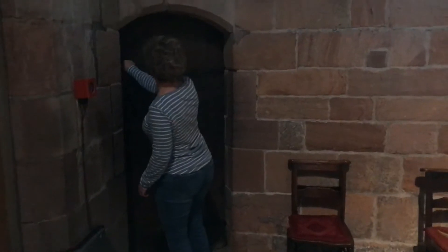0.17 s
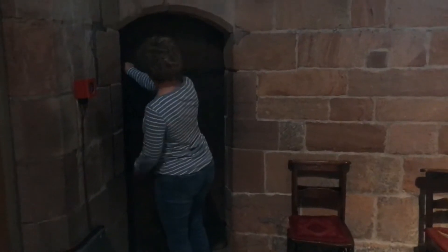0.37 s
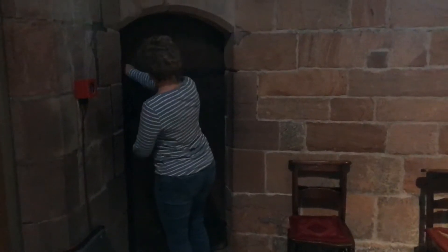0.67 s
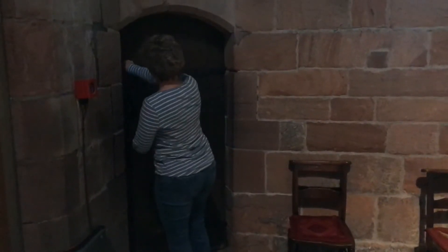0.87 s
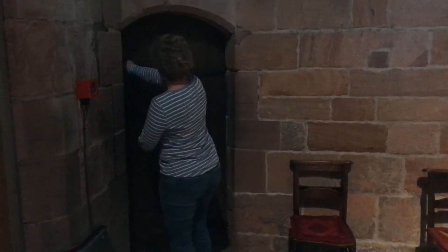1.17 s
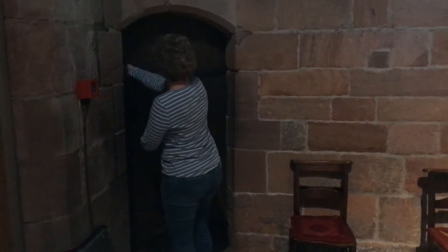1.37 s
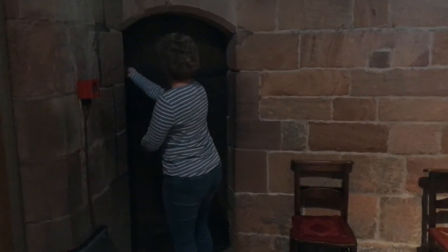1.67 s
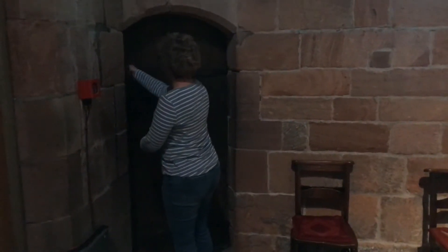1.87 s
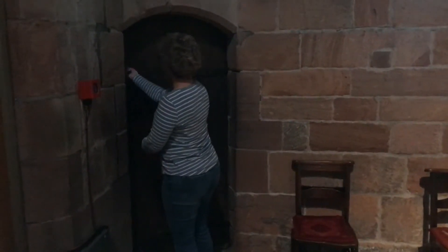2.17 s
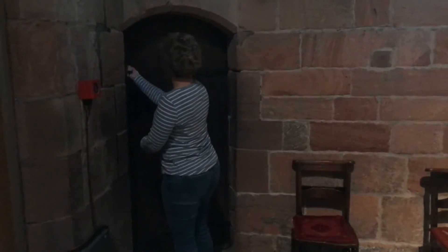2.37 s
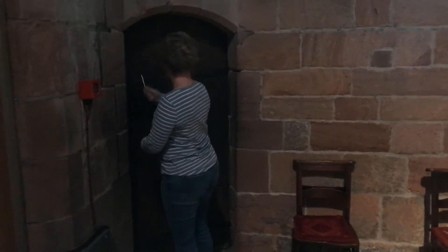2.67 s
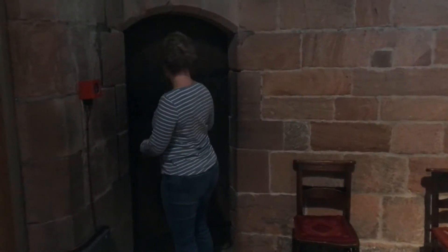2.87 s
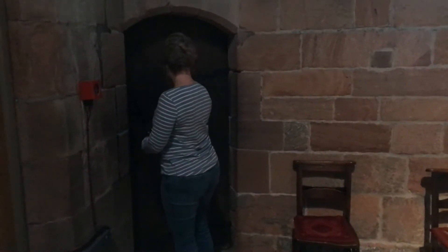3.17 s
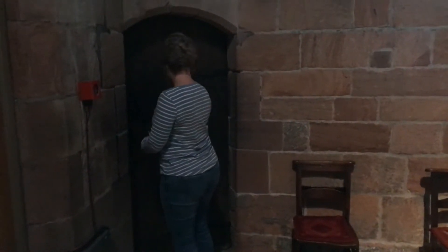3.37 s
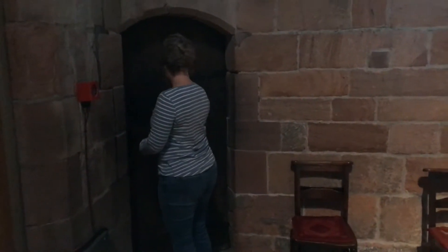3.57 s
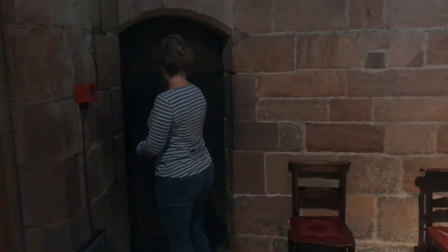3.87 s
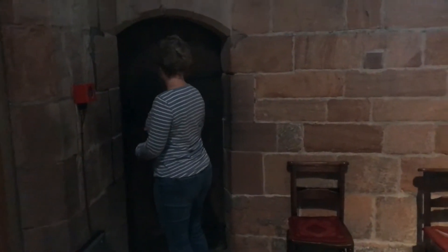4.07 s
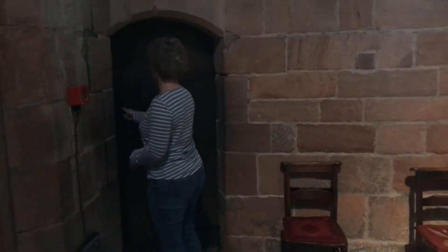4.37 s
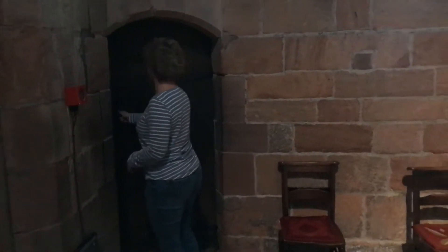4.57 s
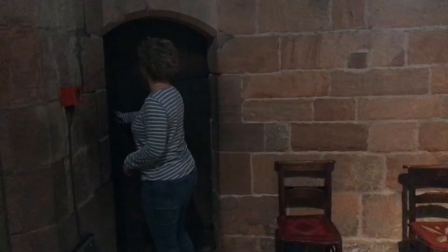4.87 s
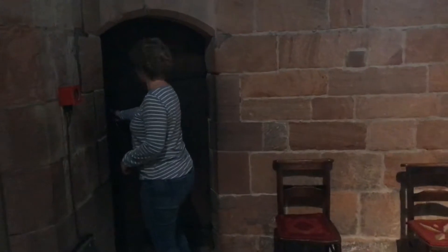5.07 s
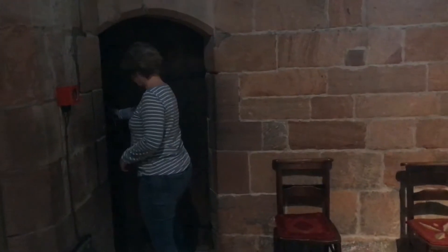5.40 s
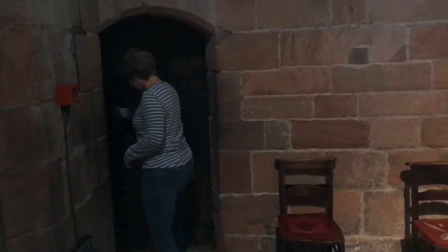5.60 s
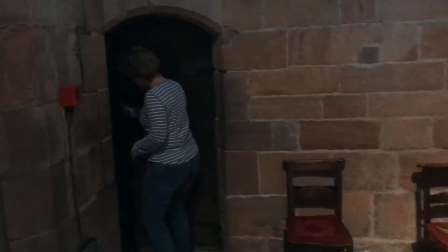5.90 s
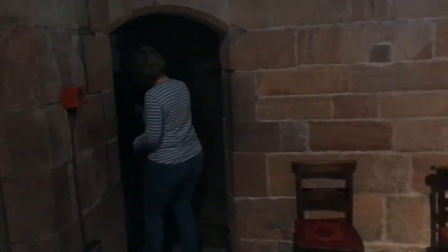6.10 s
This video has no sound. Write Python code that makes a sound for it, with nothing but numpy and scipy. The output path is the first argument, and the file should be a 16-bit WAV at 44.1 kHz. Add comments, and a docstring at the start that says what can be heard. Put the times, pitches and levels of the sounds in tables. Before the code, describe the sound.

Close to an old wooden door in a quiet stone room, iron slides and rattles in small uneven clicks, then a bolt shoots back with a loud ringing clank. Looser clinks, tiny bright metal ticks and thin squeaks follow. A lower latch clacks with a dull thud. After a pause the door is tugged free with a boom, rapid wooden shudder and gritty scrape, and the hinge briefly creaks.

```python
"""An old heavy wooden door in a stone room with a low, faint murmur. Iron slides and a sleeve brushes, then the upper
iron fastening is jiggled and shoots back with a clank; small metal ticks and thin squeaks follow, and the lower latch
clacks. The door is tugged free of its frame with a boom, a shudder and a scrape, and the hinge creaks. Blows are noise
bursts with dying sines, rubbing is many tiny slips, squeaks and creaks are repeating waves, and the stone walls ring."""
import sys
import numpy as np
from scipy import signal
from scipy.io import wavfile
from scipy.ndimage import uniform_filter1d

SR = 44100
rng = np.random.default_rng(int(sys.argv[2]) if len(sys.argv) > 2 else 0)


def to_wav(sig):
    """Store sig (one row per channel, or 1-D mono) as 16-bit WAV at the path in sys.argv[1].

    Samples outside -1..1 are clipped; the rate is SR.
    """
    pcm = np.clip(np.atleast_2d(sig), -1, 1) * 32767
    pcm = np.round(pcm).astype(np.int16)
    wavfile.write(sys.argv[1], SR, pcm.T)  # frames by channels


N = 275184  # length of the scene in samples


def amp(db):
    """Turns decibels into a gain."""
    return 10 ** (np.asarray(db) / 20)


def evened(x):
    """Scales a sound to an rms of 1."""
    return x / np.sqrt(np.mean(x ** 2) + 1e-20)


def unit_blow(x, size=441):
    """Scales a blow so that its first hundredth of a second has an rms of 1."""
    return x / np.sqrt(np.mean(x[:size] ** 2) + 1e-20)


def read(points, hz):
    """Reads a curve between its points, along a logarithmic pitch axis."""
    f, value = np.transpose(points)
    return np.interp(np.log(hz + 1), np.log(f + 1), value)


def add(mix, s, sound):
    """Mixes a sound in at time s, in seconds."""
    part = mix[max(round(s * SR), 0):][:len(sound)]
    part += sound[:len(part)]


def tilt(hz, slope_db, knee_hz=4200):
    """Harder contact lifts the treble: dB at hz for a slope per octave, level beyond both ends."""
    within = np.clip(hz, knee_hz / 16, knee_hz)
    return slope_db * np.log2(within / 1500)


def coloured(x, points, slope_db=0, size=4096):
    """Filters a sound to a spectrum, with no echo ahead of it (minimum phase)."""
    hz = abs(np.fft.fftfreq(size, 1 / SR))
    log_gain = np.log(amp(read(points, hz) + tilt(hz, slope_db)))
    response = np.exp(np.conj(signal.hilbert(log_gain)))
    taps = np.fft.ifft(response).real[:size // 2]
    return signal.oaconvolve(x, taps)[:len(x)]


def ring(modes, t, pitch=1, slope_db=0, scatter=0):
    """A struck body rings in dying sines; scatter starts them out of step."""
    out = np.zeros(len(t))
    for hz, db, t60_s in modes:
        fade = amp(db + tilt(hz, slope_db) - 60 * t / t60_s)
        turns = hz * pitch * t + scatter * rng.random()
        out += fade * np.sin(2 * np.pi * turns)
    return out


def blows(rows, colour, modes, chatter_t60_s, ring_db, grain, rise_s, detune, damping):
    """Loose parts meet in a dying burst of tiny contacts, which sound the body and ring its modes."""
    linger = 0.05  # dull blows chatter longer: doublings of the length for each dB per octave lost
    t, out = np.arange(SR // 3) / SR, np.zeros(N)
    hardest_db = max(row[1] for row in rows)
    for s, db, slope_db in rows:
        t60_s = chatter_t60_s * 2 ** (-linger * slope_db)
        noise, size = rng.standard_normal((2, len(t)))
        contacts = noise * np.exp(grain * np.tanh(size)) * amp(-60 * t / t60_s)
        onset = 1 - np.exp(-t / rise_s)
        chatter = unit_blow(coloured(contacts * onset, colour, slope_db))
        # in a light blow the parts stay in touch: their modes are damped and pulled off pitch
        lightness_db = hardest_db - db
        spread = detune * (1 + lightness_db / 2)
        held = 1 + damping * lightness_db
        struck_modes = [(hz * (1 + spread * rng.standard_normal()), level + rng.standard_normal(), decay_s / held)
                        for hz, level, decay_s in modes]
        tone = unit_blow(ring(struck_modes, t, slope_db=slope_db, scatter=0.78) * onset)
        add(out, s, amp(db) * unit_blow(chatter + amp(ring_db) * tone))
    return out


def strokes(rows, hold_s):
    """Loudness of a row of strokes: each swells, holds and fades."""
    range_db = 20  # swell and fade are the times for this change
    t = np.arange(N) / SR
    power = np.zeros(N)
    for s, db, swell_s, fade_s in rows:
        away = np.maximum(s - t, 0) / swell_s + np.maximum(t - s - hold_s, 0) / fade_s
        power += amp(db - range_db * np.minimum(away, 10)) ** 2
    return np.sqrt(power)


def friction(rows, colour, hold_s, slips_per_s, spread_db):
    """Rubbing is many small slips of uneven size under each stroke."""
    slips = (rng.random(N) < slips_per_s / SR) * rng.choice([-1, 1], N)
    sizes = amp(spread_db * np.minimum(rng.exponential(1, N), 4))
    return evened(coloured(slips * sizes, colour)) * strokes(rows, hold_s)


def spells(rows, glide_octaves, arch):
    """Pitch and gain of stick and slip: each spell swells and dies in one arch while its pitch glides."""
    t = np.arange(N) / SR
    hz, gain = np.full(N, float(rows[0][2])), np.zeros(N)
    for s, length_s, pitch_hz, db in rows:
        progress = np.clip((t - s) / length_s, 0, 1)
        hz = np.where(t < s, hz, pitch_hz * 2 ** (glide_octaves * (progress - .5)))
        gain += amp(db) * (1 - (2 * progress - 1) ** 2) ** arch
    return hz, gain


def air():
    """The building gives a steady low murmur and a faint hiss: filtered noise."""
    # still air of the room: pitch_hz, relative level_db
    air_colour = [(12, -47), (20, -16), (53, 2.5), (95, -9), (122, -3.5), (213, -5.5), (289, -4.5),
                  (519, -16.5), (581, -16.5), (1630, -20.5), (1980, -24), (3260, -28.5), (15500, -34.5)]
    level_db = -65
    return amp(level_db) * evened(coloured(rng.standard_normal(N), air_colour))


def iron_slide():
    """Iron slides on iron in many small slips, often running up to a blow."""
    # strokes: start_s of the hold, level_db, swell_s, fade_s
    slides = [(0, -66.5, 0.086, 0.84), (.44, -53.5, 0.12, 0.29), (1.15, -65.5, 0.68, 0.29),
              (1.65, -62.5, 0.76, 0.5), (2.036, -47, .04, 0.049), (3.42, -77, 0.023, .15),
              (3.79, -59, .45, 0.049)]
    # sound of the sliding iron: pitch_hz, relative level_db
    slide_colour = [(100, -12.5), (400, -1.5), (900, 2), (1600, -2), (2500, -10.5), (4500, -23),
                    (8000, -36), (16000, -29.5)]
    return friction(slides, slide_colour, hold_s=0.015, slips_per_s=1200, spread_db=-0.5)


def sleeve():
    """The sleeve brushes against the body as the arm moves: dense, very uneven slips."""
    # strokes: start_s of the hold, level_db, swell_s, fade_s
    brushes = [(.55, -77, 1.1, 1), (1.25, -75, 0.39, .6), (5.16, -65.5, 0.084, .2), (5.95, -77, 1.05, 1.6)]
    # sound of the cloth: pitch_hz, relative level_db
    cloth_colour = [(300, -0.5), (1500, -5.5), (3000, 4.5), (7000, -4), (10000, -7), (15000, 0.5)]
    return friction(brushes, cloth_colour, hold_s=0.023, slips_per_s=15000, spread_db=9)


def rumble():
    """The hand leans on the leaf and it rumbles in its frame: slips heard mostly in the bass."""
    # strokes: start_s of the hold, level_db, swell_s, fade_s
    leans = [(.9, -63, 1.3, 1.6), (1.85, -56.5, .35, 0.45), (3.7, -60.5, 1.1, .7), (5.55, -61.5, .25, 0.21),
             (6.22, -59.5, 0.38, 0.13)]
    # sound of the rumbling leaf: pitch_hz, relative level_db
    rumble_colour = [(20, -6), (45, 0.5), (80, -1.5), (130, -11), (260, -19), (600, -44), (2000, -67)]
    return friction(leans, rumble_colour, hold_s=0.022, slips_per_s=940, spread_db=1)


def room(x):
    """Quick reflections from the doorway and corner, then a long stone tail fading at its own pace at each pitch."""
    # dying away of the tail: pitch_hz, t60_s (time to fall 60 dB)
    tail_t60 = [(70, 0.94), (250, 1.16), (700, 1.81), (1300, 1.63), (2700, 1.53), (5000, 1.16),
                (9000, 0.59), (15000, 0.8)]
    # strength of the tail: pitch_hz, relative level_db
    tail_strength = [(70, 1.5), (250, 3), (700, -4.5), (1300, -7.5), (2700, -7), (5000, -7), (9000, -4),
                     (15000, -14.5)]
    early_db, early_t60_s, build_s = -6.5, 0.15, 0.0068
    t = np.arange(2 * SR) / SR
    hz, when, z = signal.stft(rng.standard_normal(len(t)), SR, nperseg=512)
    fall_db = 60 * when / read(tail_t60, hz)[:, None]
    z *= amp(read(tail_strength, hz)[:, None] - fall_db)
    tail = signal.istft(z, SR, nperseg=512)[1][:len(t)]
    tail = tail * (1 - np.exp(-t / build_s)) / np.sqrt(SR / 10)
    # about 1500 reflections a second, from 4 ms on
    hits = (rng.random(len(t)) < 1500 / SR) * (t > .004)
    early = rng.standard_normal(len(t)) * hits * amp(-60 * t / early_t60_s)
    echoes = tail + amp(early_db) * early / np.linalg.norm(early)
    return signal.fftconvolve(x, echoes)[:N]


def bolt():
    """The upper iron fastening is jiggled and shoots back: chattering contacts ring its iron."""
    # blows: start_s, level_db, brightness_db_per_octave
    clanks = [(.290, -38.5, -3.5), (.411, -48.5, 2.5), (.464, -38.5, 5.5), (.482, -38.5, -2),
              (.691, -58, 4.5), (.844, -58, 4.5), (.913, -53.5, -2.5), (.942, -49, -6), (1.054, -46, 1.5),
              (1.380, -60.5, 0), (1.411, -45, -2.5), (1.431, -47.5, 2.5), (1.468, -44.5, 2),
              (1.572, -41, -2.5), (1.590, -41.5, 0), (2.0402, -19, -2), (2.046, -24.5, 11.5),
              (2.058, -34, -7), (2.418, -37, -0.5), (2.442, -39.5, -6), (2.454, -39.5, -5),
              (2.470, -45.5, 0)]
    # sound of the chatter: pitch_hz, relative level_db
    iron_colour = [(60, -31), (160, -21), (250, -19.5), (450, -12), (1000, 2.5), (1600, 3), (2300, -5.5),
                   (3200, -3.5), (4500, -11.5), (6800, -20), (8300, -16), (10500, -24), (13000, -20.5),
                   (16000, -24)]
    # ringing of the iron in the hardest blow, before small random shifts: pitch_hz, relative level_db, t60_s
    iron_modes = [(242, -22, .1), (620, -8, .09), (938, -5, .08), (1108, 3, .1), (1257, -4, .09),
                  (1429, -4, .09), (1533, -2, .09), (1709, -1, .11), (1995, -9, .1), (2347, -10, .1),
                  (2890, -12, .07), (3300, -10, .09), (4386, -11, .08), (4840, -16, .08), (5980, -21, .08),
                  (7880, -21, .06), (8330, -18, .07), (9525, -22, .06)]
    return blows(clanks, iron_colour, iron_modes, chatter_t60_s=0.053, ring_db=-5.5, grain=0.47,
                 rise_s=0.0034, detune=0.0013, damping=0.16)


def leaf():
    """Shoves make the heavy leaf boom in its bending modes; the push takes a moment to build."""
    # shoves: start_s, level_db before the build-up, pitch_factor
    thuds = [(0.485, -57, 1.4), (1.059, -61.5, 1.2), (2.43, -51, 1.3), (3.821, -39.5, 1.24),
             (5.445, -46.5, 1.5), (5.48, -27.5, 1.1), (5.756, -44, 0.96)]
    # bending of the leaf: pitch_hz before the pitch factor, relative level_db, t60_s
    leaf_modes = [(60.83, 2.5, 0.54), (85, -7, 0.14), (106, -7, 0.18), (118, -11.5, 0.051)]
    t, out = np.arange(SR // 2) / SR, np.zeros(N)
    build = 1 - np.exp(-t / 0.0013)
    for s, db, pitch in thuds:
        boom = unit_blow(ring(leaf_modes, t, pitch))
        add(out, s, amp(db) * boom * build)
    return out


def rebounding(rows):
    """Each blow is followed by one softer, duller rebound."""
    delay_s, change_db, slope_change_db = .009, -9, -8.5
    return rows + [(s + delay_s, db + change_db, slope_db + slope_change_db) for s, db, slope_db in rows]


def metal_ticks():
    """Small pieces of metal tick and rebound: tiny contacts with a thin, high ring."""
    # ticks: start_s, level_db, brightness_db_per_octave
    tick_rows = [(.780, -65, -12), (1.620, -58.5, 4), (2.578, -60, 3), (2.624, -56.5, 5.5),
                 (2.659, -55.5, -1), (2.879, -60, 5.5), (2.924, -62.5, 4), (2.961, -50.5, -5.5),
                 (2.968, -42, 5.5), (3.028, -42.5, 0), (3.1097, -41.5, 2), (3.1845, -45, 6),
                 (3.2099, -50, -0.5), (5.653, -54, -2)]
    # sound of the chatter: pitch_hz, relative level_db
    tick_colour = [(300, -30.5), (1200, -7.5), (2600, -4.5), (4000, -6), (5300, 2), (7200, -7), (9200, 6.5),
                   (12500, -10), (15000, 3.5)]
    # ringing of the metal in the hardest tick, before small random shifts: pitch_hz, relative level_db, t60_s
    tick_modes = [(3290, -7.5, 0.067), (4760, -8.5, 0.15), (5500, 2, 0.023), (6100, -7.5, 0.056),
                  (9700, -7.5, 0.027), (11600, 4.5, 0.14), (13300, 7.5, 0.055), (15300, 4.5, 0.075)]
    return blows(rebounding(tick_rows), tick_colour, tick_modes, chatter_t60_s=0.04, ring_db=-4.5, grain=1.3,
                 rise_s=.001, detune=0.03, damping=0.17)


def squeak(waver):
    """Metal rubbing on metal sings briefly in a few unsteady, inharmonic partials."""
    # squeaks: start_s, length_s, pitch_hz half way (before the waver), level_db
    squeaks = [(2.950, 0.019, 4960, -58), (2.982, 0.028, 5230, -53), (3.010, 0.027, 5510, -54.5)]
    # partials: multiple of the pitch, relative level_db
    partials = [(1, 5.5), (1.19, -12), (2.27, 4), (2.85, -7.5)]
    hz, gain = spells(squeaks, glide_octaves=0.024, arch=0.3)
    wander = evened(uniform_filter1d(rng.standard_normal(N), size=60))
    turns = np.cumsum(hz * (1 + waver * wander)) / SR
    tone = sum(amp(level) * np.sin(2 * np.pi * k * turns) for k, level in partials)
    grip = evened(uniform_filter1d(rng.standard_normal(N), size=120))  # the contact catches and lets go
    return evened(tone) * grip * gain


def judder(count):
    """Tugged free, the sticking door edge catches at even gaps."""
    start_s, gap_s, middle_db, middle_slope_db = 5.490, .017, -31.5, 0
    ends_db, ends_slope_db = -2, -1  # change towards the first and last of these even catches
    edges = np.linspace(-1, 1, count) ** 2
    return [(start_s + k * gap_s, middle_db + edge * ends_db, middle_slope_db + edge * ends_slope_db)
            for k, edge in enumerate(edges)]


def wood_knocks():
    """The door knocks and judders on its frame; the last catch, doubled by a knock, is hardest and brightest."""
    # knocks besides the even catches, one of them together with the last catch:
    # start_s, level_db, brightness_db_per_octave
    knocks = [(3.406, -61, 0), (5.575, -30.5, 2), (5.605, -48, 4), (6.184, -42, -0.5)]
    # sound of the chatter: pitch_hz, relative level_db
    wood_colour = [(50, -0.5), (110, 4), (160, 0), (280, 2), (420, -4), (620, 0), (1000, 0.5), (1650, 0.5),
                   (2300, -11), (3300, -15.5), (5000, -31.5), (9000, -43.5), (16000, -42)]
    # ringing of the planks in the hardest knock, before small random shifts: pitch_hz, relative level_db, t60_s
    plank_modes = [(183, 13.5, 0.15), (250, 6, 0.1), (261.7, 6, 0.22), (276, -4, 0.17), (572, 2, 0.14),
                   (920, -13, 0.11)]
    return blows(judder(count=6) + knocks, wood_colour, plank_modes, chatter_t60_s=.068, ring_db=-9.5, grain=0.81,
                 rise_s=0.0005, detune=0.0014, damping=.03)


def latch():
    """The lower latch clacks: a few close blows ring its metal."""
    # blows: start_s, level_db, brightness_db_per_octave
    clacks = [(3.8195, -29.5, 2.5), (3.826, -23, -1), (3.837, -35.5, 1.5)]
    # sound of the chatter: pitch_hz, relative level_db
    latch_colour = [(50, -12), (130, 1), (260, -6), (380, -8), (750, -5.5), (950, -6.5), (1300, 10),
                    (1650, -1), (2300, -7), (2700, -5.5), (3700, -18), (4500, -22.5), (5400, -30.5),
                    (16000, -45.5)]
    # ringing of the latch in the hardest blow, before small random shifts: pitch_hz, relative level_db, t60_s
    latch_modes = [(1122, -19, 0.3), (1254, 3, 0.14), (1405, 4, 0.12), (1475, -3, 0.08), (1755, -20, .2),
                   (2589, -12, .2), (3090, -20, .2), (4371, -21, .14)]
    return blows(clacks, latch_colour, latch_modes, chatter_t60_s=0.04, ring_db=-9, grain=0.23,
                 rise_s=.001, detune=0.0022, damping=0.055)


def scrape():
    """The door edge drags over the stone in many gritty slips."""
    # strokes: start_s of the hold, level_db, swell_s, fade_s
    drags = [(5.445, -58, 0.014, .08), (5.514, -38, 0.028, .03)]
    # sound of the grit: pitch_hz, relative level_db
    grit_colour = [(200, -0.5), (1500, 4), (3000, -8), (5500, -9), (7500, -15.5), (9800, -14.5),
                   (12500, -27), (16000, -24)]
    return friction(drags, grit_colour, hold_s=0.04, slips_per_s=1800, spread_db=3.5)


def hinge(jitter, rough, fall=0.94):
    """The hinge sticks and slips: a short squeal that slows to a groan, sounded by the door."""
    # two squeals and a groan: start_s, length_s, slips_per_s half way (before the jitter), level_db
    creaks = [(6.110, 0.026, 990, -40), (6.133, 0.036, 795, -45), (6.175, 0.031, 210, -42)]
    # sound of the door under the hinge: pitch_hz, relative level_db
    hinge_colour = [(100, 6), (230, 0), (420, 2.5), (850, 7), (1250, 1.5), (1650, 0), (2200, -21),
                    (3000, -28), (3450, -14), (4200, -24), (9000, -37)]
    hz, gain = spells(creaks, glide_octaves=-0.089, arch=0.86)
    wander = evened(uniform_filter1d(rng.standard_normal(N), size=40))
    turns = np.cumsum(hz * (1 + jitter * wander)) / SR
    slips = np.zeros(N)
    for k in range(1, 24):
        # fast slips are rounded, slow ones snap
        strength = (k * hz < SR / 4) / k ** (fall * hz / 800)
        slips += np.cos(2 * np.pi * k * turns) * strength
    creak = coloured(slips + rough * rng.standard_normal(N), hinge_colour)
    loudness = np.sqrt(abs(uniform_filter1d(creak ** 2, size=600)) + 1e-12)
    return gain * creak / loudness


def scene():
    """Everything on the door sounds into the room; the small ticks and squeaks send less into it."""
    door = iron_slide() + sleeve() + rumble()
    door += bolt() + leaf() + wood_knocks() + latch()
    door += scrape() + hinge(jitter=0.027, rough=2.0)
    ticks = metal_ticks() + squeak(waver=0.012)
    echoes = room(door + amp(-4) * ticks)
    return (door + ticks + echoes + air())[None]


def record(dry):
    """The recorder rolls off the bass and cuts the highest treble."""
    bass_edge_hz, treble_edge_hz = 42, 16150
    dry = signal.sosfilt(signal.butter(3, bass_edge_hz, "highpass", fs=SR, output="sos"), dry)
    taps = signal.firwin(401, treble_edge_hz, window=("kaiser", 8), fs=SR)
    return signal.oaconvolve(dry, taps[None], "same")


dry = scene()
out = record(dry)
to_wav(out)
```